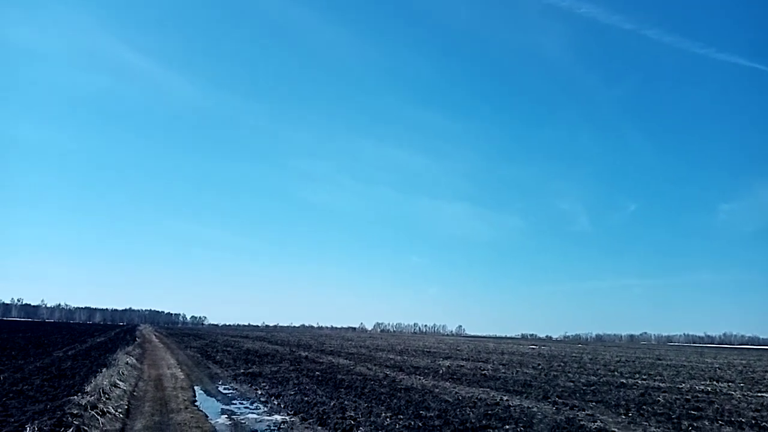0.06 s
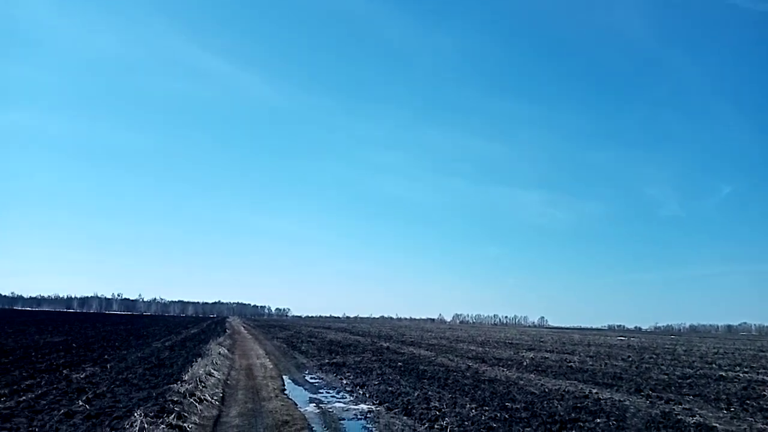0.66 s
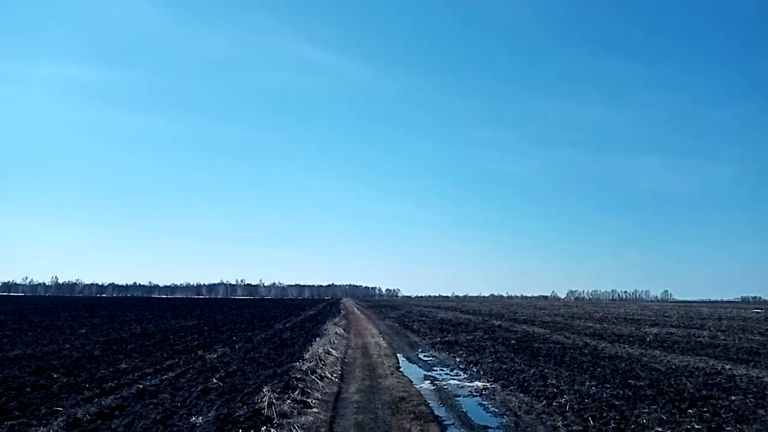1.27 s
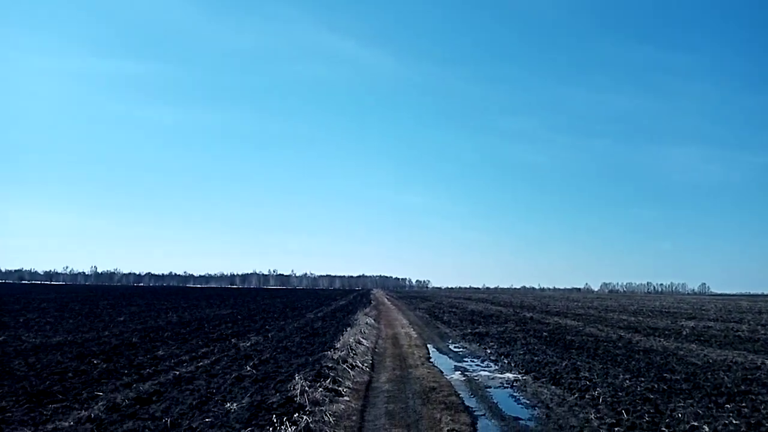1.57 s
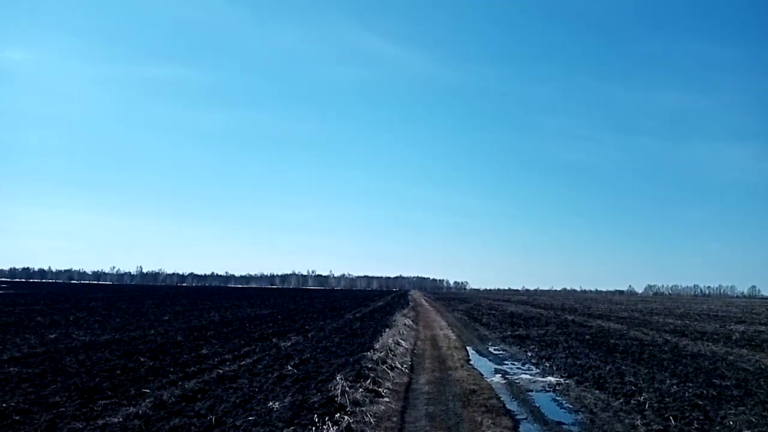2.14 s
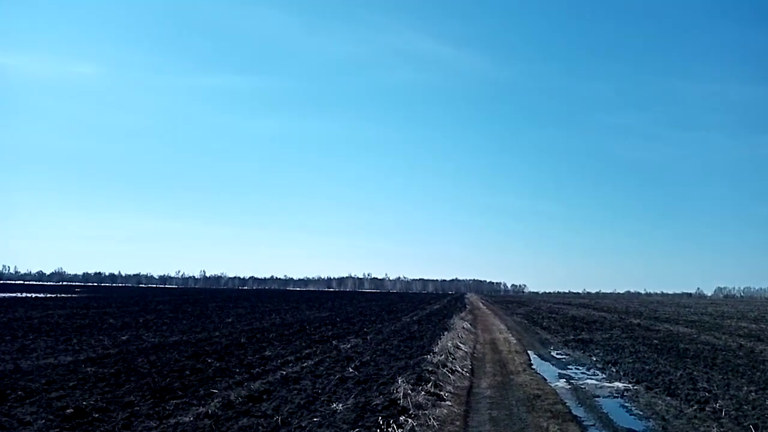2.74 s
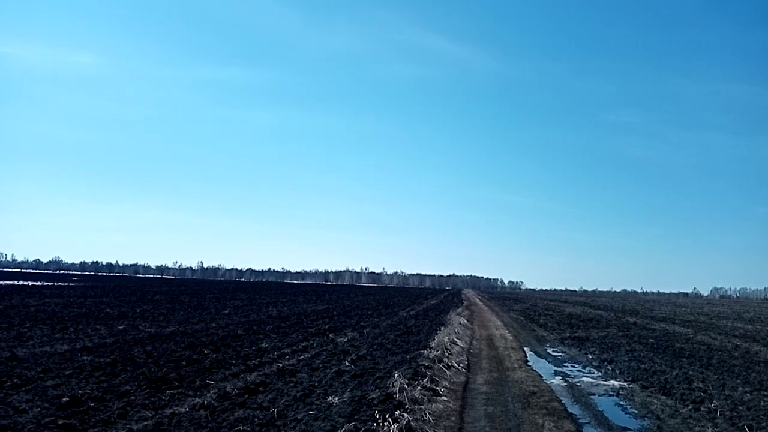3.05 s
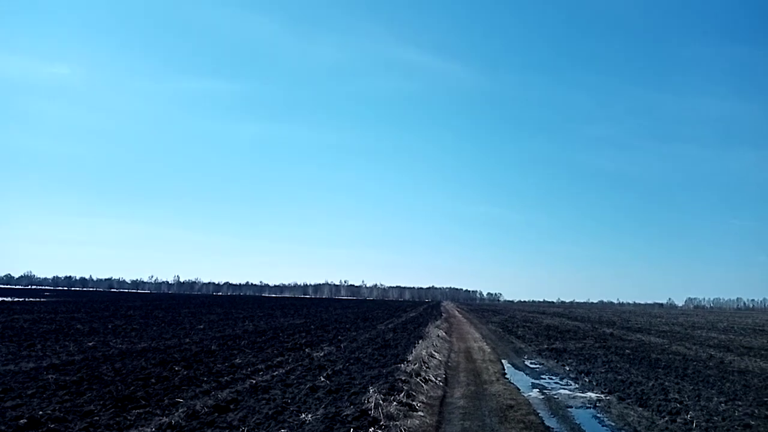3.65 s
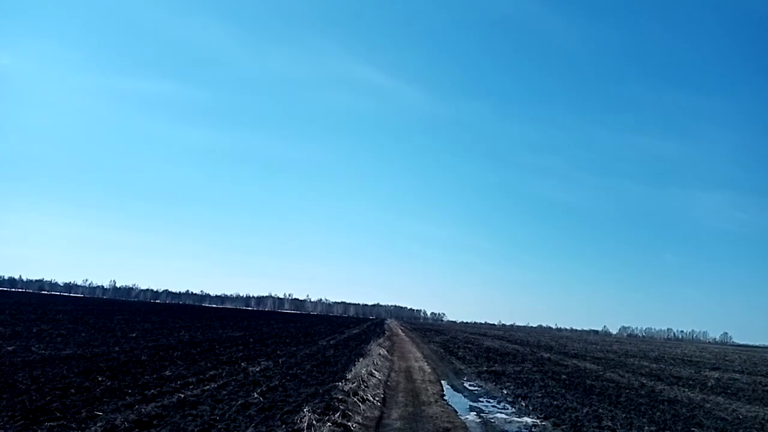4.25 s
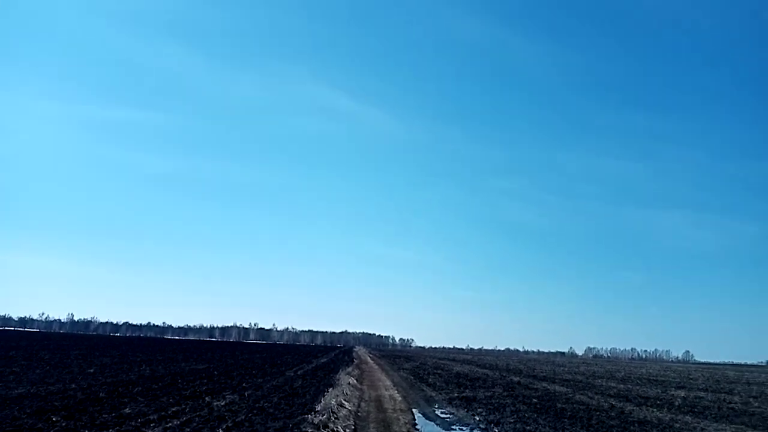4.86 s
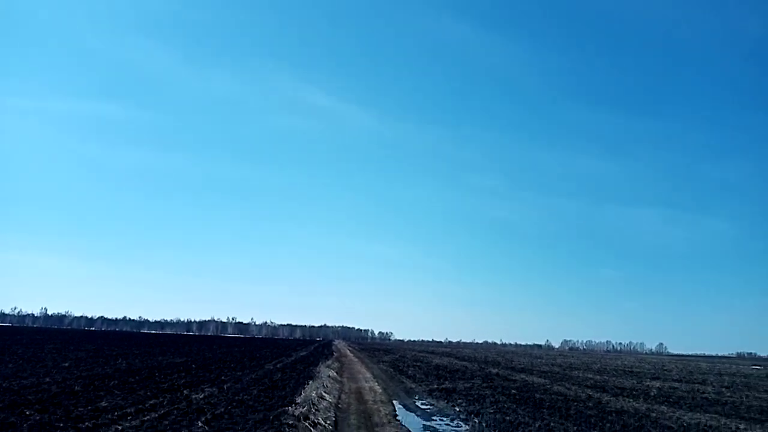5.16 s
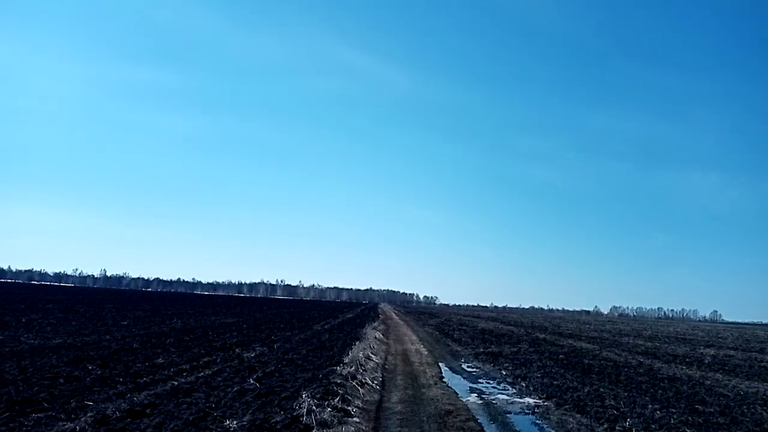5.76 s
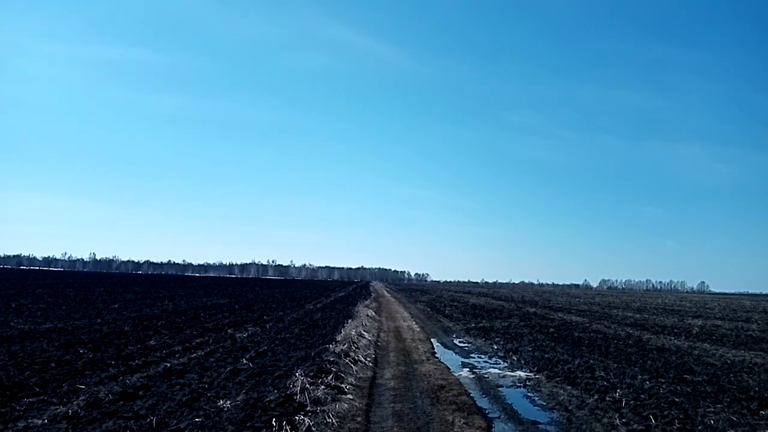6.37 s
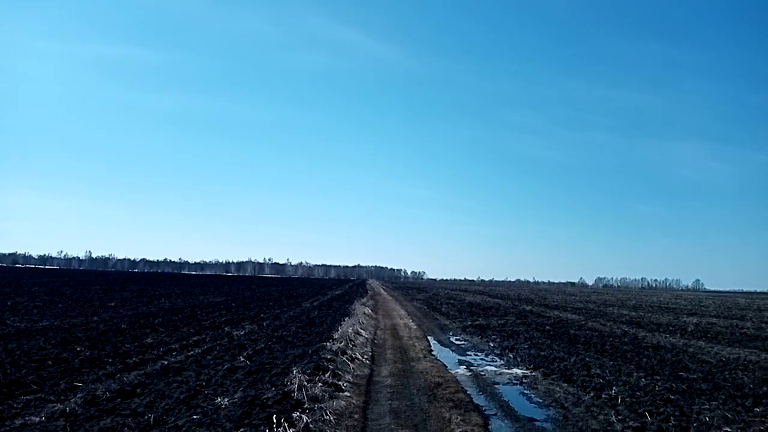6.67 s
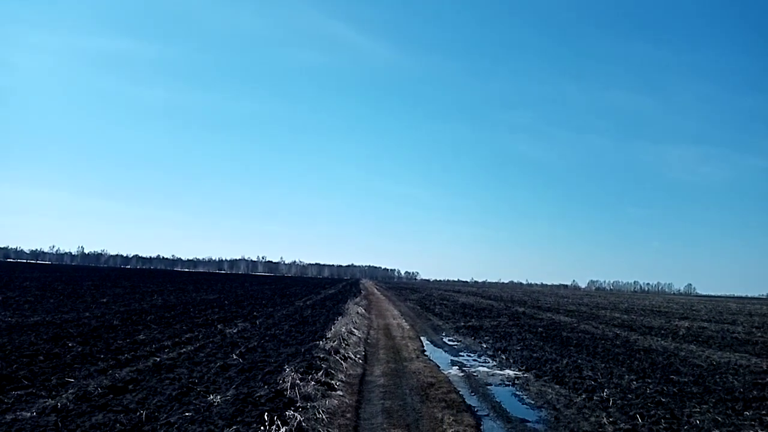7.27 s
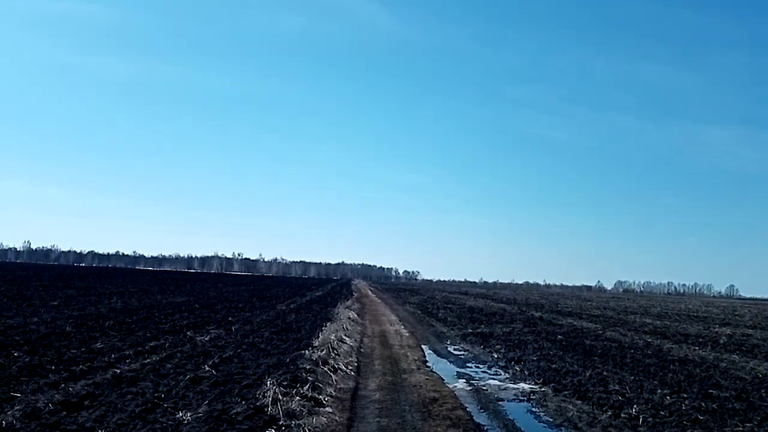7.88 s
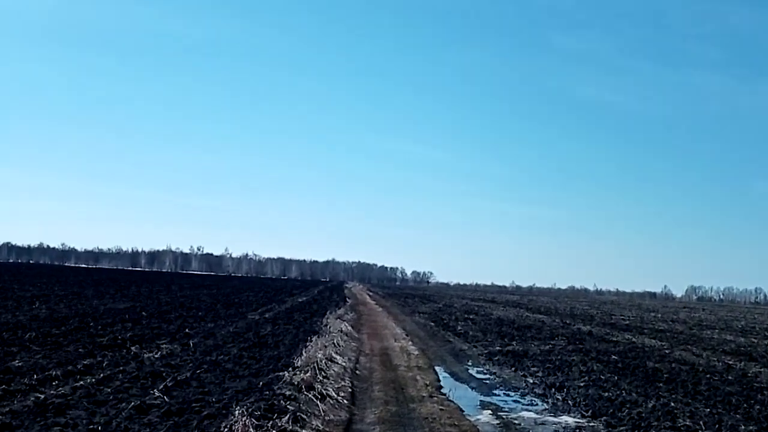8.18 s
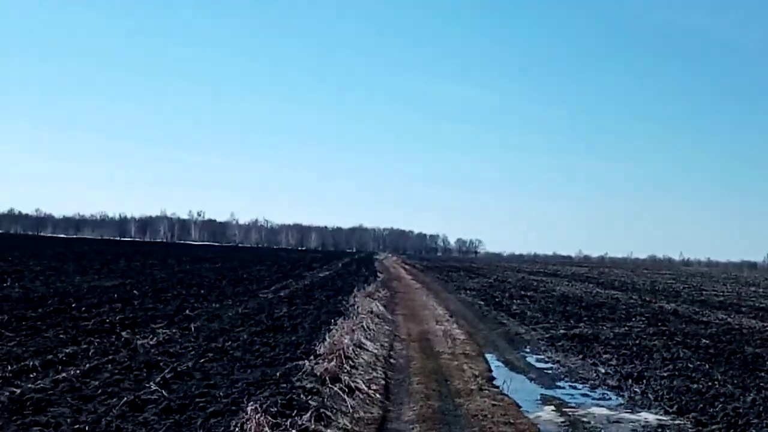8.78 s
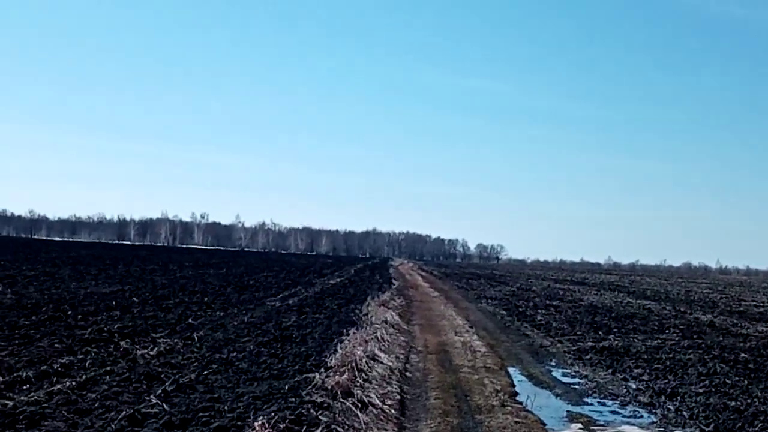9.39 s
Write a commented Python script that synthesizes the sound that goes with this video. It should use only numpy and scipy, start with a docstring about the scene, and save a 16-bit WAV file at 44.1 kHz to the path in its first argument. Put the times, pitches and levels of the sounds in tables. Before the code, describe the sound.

Low wind buffets the microphone while a lark pours out continuous fast trills and whistles, with faint larks far away.

```python
"""A skylark's falling whistle over low wind rumble, then chips and fast trills, often two voices at once.
Its syrinx glides a near-sine tone, or opens and shuts quickly for trills and buzzes.
The ploughed field returns a faint echo; distant larks twitter in a quiet hiss.
A light breeze blows eddies past each microphone port separately, with one strong gust near 3.8 s.
Later something rustles softly near the microphone."""
import sys
import numpy as np
from scipy import signal
from scipy.fft import rfft, irfft, next_fast_len
from scipy.io import wavfile
from scipy.ndimage import uniform_filter1d, map_coordinates

SR = 44100
rng = np.random.default_rng(int(sys.argv[2]) if len(sys.argv) > 2 else 0)


def file_out(sig):
    """Save sig as 16-bit WAV at sys.argv[1]."""
    # one column per channel
    cols = np.atleast_2d(sig).T
    # limit, then scale
    lim = np.clip(cols, -1, 1)
    pcm = np.round(lim * 32767).astype(np.int16)
    wavfile.write(sys.argv[1], SR, pcm)


N = 420273
TIME = np.arange(N) / SR

# Note levels are taken ahead of the gains in field().
# gliding pure notes: t/s, length/s, start f/Hz, middle f/Hz, end f/Hz, level/dB, S-bend/Hz
WHISTLE_NOTES = [(0, 0.11, 4390, 4010, 3830, -62.5, 38), (.226, 0.16, 4294, 4070, 3935, -66, 145),
                 (1.458, 0.048, 4636, 4380, 4760, -74.5, 4), (1.618, 0.21, 5070, 3972, 4700, -66.5, -170),
                 (2.256, 0.045, 4600, 4690, 5440, -70, 8), (2.489, 0.08, 2850, 2560, 3490, -68, -2),
                 (4.063, 0.25, 2627, 2958, 2380, -66.5, 274), (4.255, 0.015, 1260, 1600, 1870, -73.5, -4),
                 (4.43, 0.036, 3380, 3510, 3460, -63, 0), (7.283, 0.014, 5096, 4640, 3630, -65, 2.5),
                 (7.605, 0.064, 5220, 5190, 4820, -62, -42), (7.922, 0.015, 2746, 2880, 4270, -68.5, -5),
                 (8.154, 0.046, 3308, 3662, 3755, -62.5, 15), (8.648, 0.035, 4888, 4940, 4870, -68.5, 0),
                 (9.303, 0.21, 4354, 4430, 3534, -61.5, -100)]
# notes pulsed into upward flicks: t/s, length/s, start f/Hz, end f/Hz, level/dB, pulse rate/Hz
TRILL_NOTES = [(0, 0.22, 3490, 2539, -80, 89), (.147, 0.057, 5300, 5190, -66, 350),
               (1.08, 0.16, 3410, 3380, -80, 146.6), (1.22, 0.15, 3280, 2380, -82.5, 100),
               (2.476, 0.24, 4120, 4200, -77, 204), (3.119, 0.24, 4550, 4580, -84.5, 80),
               (3.673, 0.36, 4647, 3747, -69, 178), (4.093, 0.055, 4890, 4475, -81.5, 56),
               (4.289, 0.2, 3920, 4550, -80.5, 100), (4.478, 0.067, 4860, 5150, -72, 87),
               (4.872, 0.13, 5580, 3684, -68, 143), (4.961, 0.16, 3508, 3247, -65.5, 170),
               (5.493, .086, 4750, 3800, -79.5, 83), (5.634, 0.22, 4350, 4540, -81, 92),
               (7.14, 0.16, 3068, 2870, -82, 143.4), (7.314, 0.14, 2984, 2993, -68, 83),
               (7.41, 0.28, 3527, 3710, -73, 234), (9.15, 0.18, 3850, 3720, -78, 92)]
# bird's bearing as the microphone turns: t/s, right port lag/s, left minus right/dB
BIRD_BEARING = [(0, 0.0011, -2.5), (3.8, 0.0011, 5.5), (5.6, 0.001063, -4), (8.999, 0.001, -1)]
# steady breeze: t/s, left level/dB, right level/dB
BREEZE_LEVELS = [(0, -41, -43), (0.85, -40, -50), (1.35, -38, -43), (2.101, -40, -44), (2.699, -47, -43),
                 (3.002, -56, -56), (3.298, -48, -45), (4.251, -39, -41), (4.698, -50, -45),
                 (5.801, -46, -44), (6.699, -51.5, -46.5), (7.6, -49, -41.5), (8.6, -53.5, -45.5),
                 (9.502, -54, -43)]
# gusts on top: t/s, half length/s, left peak/dB, right peak/dB
GUST_PEAKS = [(0.69, .13, -34, -52), (1.589, 0.11, -38, -54), (3.214, 0.042, -37, -42.5),
              (3.491, .09, -52, -33), (3.705, 0.034, -25.5, -39.5), (3.785, .065, -27, -44),
              (3.966, 0.039, -26.5, -31), (4.168, .12, -36, -45.5), (4.88, 0.084, -41, -50.5),
              (5.58, 0.16, -38.5, -45.5), (5.943, .12, -37.5, -47), (6.202, 0.053, -37, -52),
              (6.38, 0.065, -52.5, -41), (8.013, .12, -42, -38), (9.149, 0.083, -57.5, -42)]
# tight eddies at one port: t/s, peak before bass cut/dB, half width/s, port (0 left, 1 right)
EDDY_THUMPS = [(.051, -22, .0009, 0), (.604, -20, .0009, 0), (.679, -21, .0009, 0), (.721, -13, .001, 0),
               (.729, -19, .0012, 0), (.906, -26, .0011, 0), (1.194, -24, .0008, 1), (1.274, -18, .001, 0),
               (1.568, -16, .0013, 0), (1.772, -25, .0007, 0), (2.161, -27, .0007, 0),
               (2.733, -21, .001, 0), (3.669, -13, .0006, 0), (3.684, -13, .0007, 0),
               (3.703, -15, .0007, 0), (3.708, -11, .0006, 0), (3.735, -18, .00055, 0),
               (3.784, -24, .0005, 0), (3.811, -24, .0004, 0), (3.981, -14, .00055, 0), (3.99, -9, .002, 0),
               (3.993, -21, .0006, 0), (5.896, -20, .0012, 0), (6.218, -19, .003, 0),
               (7.745, -30, .0008, 1)]
# still air and microphone hiss: f/Hz, relative density/dB
HISS_SPECTRUM = [(1000, 0), (2000, -1.5), (4000, 0), (6300, -4), (8000, -9), (14000, -12)]
# repeated note: first t/s, last t/s, repeats, length/s, start f/Hz, middle f/Hz, end f/Hz, level/dB
CHIP_RUNS = [ (0.344, 0.931, 6, 0.02, 4500, 5080, 4370, -73),
             (0.382, 0.964, 6, .014, 4230, 4820, 6020, -75),
             (0.405, 0.985, 6, 0.032, 6620, 6060, 5950, -81.5),
             (0.434, 0.915, 8, 0.0096, 2460, 2266, 2200, -74),
             (0.445, 0.928, 8, 0.017, 3110, 3570, 4040, -69),
             (0.483, 0.832, 4, 0.0099, 4030, 4000, 3840, -67.5),
             (1.034, 1.176, 5, 0.013, 5380, 4815, 4640, -67.5),
             (1.257, 1.369, 4, 0.015, 4060, 4207, 4100, -66),
             (4.702, 4.765, 2, 0.01, 2600, 2678, 2840, -73),
             (4.819, 4.873, 4, 0.011, 5200, 5950, 6385, -78.5),
             (6.086, 6.199, 4, 0.011, 5080, 5460, 5240, -78.5),
             (6.621, 6.872, 4, .02, 3000, 3100, 2900, -87),
             (8.665, 8.742, 4, 0.0077, 5396, 5880, 6600, -73)]
# unbroken sweeps: t/s, length/s, start f/Hz, end f/Hz, level/dB, rate/Hz, sweep/Hz (minus: downward)
BUZZ_NOTES = [(.988, 0.2, 4680, 4480, -74.5, 134, -600), (1.251, 0.18, 3905, 3950, -74.5, 73, -1300),
              (1.46, .15, 5350, 5480, -68.5, 135, -1000), (1.888, 0.057, 5090, 6167, -68, 70, -800),
              (1.979, 0.07, 3780, 3550, -65, 52, -700), (2.086, .14, 3920, 3950, -70, 85, -1300),
              (2.36, 0.076, 2870, 2700, -76, 68, -1280), (2.728, 0.068, 5140, 5670, -70.5, 260, -1500),
              (4.523, 0.11, 4943, 4390, -72.5, 92, -500), (4.675, 0.073, 4200, 3191, -71, 130, -1400),
              (5.464, 0.18, 2944, 3027, -71.5, 91, -1360), (7.165, 0.087, 3920, 3820, -68.5, 90, -600),
              (7.504, .08, 4380, 5396, -67, 170, 802), (7.718, 0.16, 4453, 2946, -65, 66, -950),
              (7.858, 0.03, 6970, 5725, -72, 75, -1600), (7.946, 0.033, 7000, 5217, -69.5, 150, -1600),
              (7.951, 0.16, 4035, 3784, -68, 156, -1350), (8.45, 0.18, 4892, 5014, -67.5, 150, -1650),
              (8.69, 0.17, 4110, 2819, -63.5, 110, 650)]
# short dropping notes: t/s, length/s, f/Hz, level/dB
PIP_NOTES = [(1.625, 0.05, 5090, -66), (1.752, 0.017, 3020, -75), (2.29, 0.017, 4300, -68),
             (2.327, 0.036, 3550, -67), (2.624, 0.026, 3500, -70), (2.656, 0.023, 3357, -62.5),
             (3.388, 0.025, 3465, -68), (3.413, 0.011, 3690, -63.5), (3.465, 0.037, 4610, -75.5),
             (4.728, 0.032, 3530, -69.5), (7.138, 0.021, 4395, -64), (8.142, 0.017, 4265, -66)]
# stuttering falls: t/s, length/s, start f/Hz, level/dB
SLIDE_NOTES = [(3.49, 0.14, 4790, -72.5), (5.618, 0.15, 3000, -78), (8.23, 0.16, 3870, -71.5)]
# soft rubbing: t/s, half length/s, level/dB
RUSTLE_SWELLS = [(4.53, .04, -79), (4.74, .06, -74), (4.838, .0015, -57), (4.9, .05, -82), (8.0, .15, -84)]
# its colour: f/Hz, relative density/dB
RUSTLE_SPECTRUM = [(400, -10), (900, 10), (1400, 3), (2100, 8), (4000, 0), (6300, -1), (9000, -11),
                   (14000, -24)]
# even run of held, then dropped notes: t/s, held f/Hz, held level/dB
HOOK_NOTES = [(5.153, 4733, -68.5), (5.202, 4970, -62.5), (5.249, 4990, -63.5), (5.299, 4960, -64),
              (5.35, 5039, -55)]
# recurring phrase: t/s, opening level/dB, ending level/dB
PHRASE_REPEATS = [(5.821, -65.5, -64.5), (6.188, -65, -66), (8.922, -65, -70.5)]
# long buzzy falls: t/s, length/s, top f/Hz, level/dB
SLUR_NOTES = [(6.562, .203, 5040, -68), (6.841, .225, 5180, -66)]

FLICK_SWEEP_HZ, BUZZ_SHARPNESS = 700, .26


def amp(db):
    """dB to amplitude."""
    return 10 ** (np.asarray(db) / 20)


def unit_rms(x):
    """Scale to rms 1."""
    return x / np.sqrt(np.mean(x ** 2) + 1e-20)


def clock(length_s):
    """Sample times of one note."""
    return np.arange(0, length_s, 1 / SR)


def add(mix, at_s, sound):
    """Mix a sound in at at_s."""
    part = mix[max(round(at_s * SR), 0):][:len(sound)]
    part += sound[:len(part)]


def noise(gain_at):
    """Noise of rms 1 with spectrum gain_at(hz)."""
    size = next_fast_len(N, True)
    spectrum = rfft(rng.standard_normal(size)) * gain_at(np.fft.rfftfreq(size, 1 / SR))
    return unit_rms(irfft(spectrum, size)[:N])


def stereo_noise(spectrum):
    """Independent noise per port, coloured by rows of f/Hz, level/dB."""
    f_hz, db = np.transpose(spectrum)
    return np.array([noise(lambda hz: amp(np.interp(np.log(hz + 1), np.log(f_hz), db)))
                     for _ in range(2)])


def wander(t, rate_hz):
    """Random line with rate_hz knots a second."""
    return np.interp(t * rate_hz, np.arange(2048), np.clip(rng.standard_normal(2048), -2.4, 2.4))


def syrinx(t, pitches_hz, db, sweep_hz=0, pulsing=1, waver=.009, swell_db=2, flutter_db=2):
    """Near-sine voice gliding through a few pitches, with swell and flutter."""
    progress = t / t[-1]
    glide = np.polyfit(np.linspace(0, 1, len(pitches_hz)), pitches_hz, len(pitches_hz) - 1)
    hz = np.polyval(glide, progress) * (1 + waver * wander(t, 440)) + sweep_hz
    gate = np.sin(np.pi / 2 * np.clip(np.minimum(t, t[-1] - t) / .002, 0, 1)) ** 2
    shape_db = swell_db * (progress + np.sin(np.pi * progress)) + flutter_db * wander(t, 150)
    tone = np.sin(2 * np.pi * np.cumsum(hz) / SR)
    return amp(db) * unit_rms(gate * pulsing * amp(shape_db) * tone)


def whistle(length_s, start_hz, middle_hz, end_hz, db, bend_hz):
    """Pure arc; an S-bend moves its turn early or late."""
    t = clock(length_s)
    return syrinx(t, [start_hz, middle_hz, end_hz], db, bend_hz * np.sin(2 * np.pi * t / length_s))


def pulsed_syrinx(t, pitches_hz, db, rate_hz, sweep_hz, sharpness, scatter=.1, focus=2, taper_db=-6):
    """The syrinx opens and shuts quickly; each opening is a tiny, slightly uneven glide."""
    cycle = np.cumsum(rate_hz * (1 + .06 * wander(t, rate_hz / 2))) / SR % 1
    opening = np.sin(np.pi * cycle) ** 2
    valve = .018 + opening ** (sharpness / 2)  # leaks when shut
    # pitch swings back while the valve is nearly shut
    swing = -(np.sin(2 * np.pi * cycle) + np.sin(4 * np.pi * cycle) / np.pi) / np.sqrt(2 * np.pi)
    swing += scatter * wander(t, 2 * rate_hz)
    arch = abs(np.sin(np.pi * t / t[-1])) ** .25
    throat = np.exp(-focus * swing ** 2)  # favours mid-glide
    pulsing = valve * np.sqrt(arch) * throat * amp(taper_db * (t / t[-1]) ** 4)
    return syrinx(t, pitches_hz, db, sweep_hz * swing * arch, pulsing, swell_db=1)


def trill(length_s, start_hz, end_hz, db, rate_hz):
    """Upward flicks on a glide that starts fast and settles; slower flicks reach further."""
    pitches_hz = [start_hz, start_hz + .7 * (end_hz - start_hz), end_hz]
    sweep_hz = FLICK_SWEEP_HZ * np.sqrt(120 / rate_hz)
    return pulsed_syrinx(clock(length_s), pitches_hz, db, rate_hz, sweep_hz, sharpness=.36)


def field(song, gain_db=5, ground_gain=.35, ground_s=.0075,
          near_db=-12, near_t60_s=.23, far_db=-21, far_t60_s=1):
    """Song reaches the left port first; the ground mirrors it, clods and far furrows scatter it."""
    mirrored = np.pad(song, (round(ground_s * SR), 0))[:N]
    song = amp(gain_db) * (song + ground_gain * mirrored)
    at_s, *bearing = np.transpose(BIRD_BEARING)
    lag_s, lean_db = (np.interp(TIME, at_s, column) for column in bearing)
    left = song * amp(lean_db / 2)
    right = map_coordinates(song, [(TIME - lag_s) * SR], order=3) * amp(-lean_db / 2)
    t = TIME[:SR // 2]
    ports = []
    for direct in (left, right):
        near, far = rng.standard_normal((2, len(t))) * amp([-60 * t / near_t60_s, -60 * t / far_t60_s])
        echo = amp(near_db) * near / np.linalg.norm(near) + amp(far_db) * far / np.linalg.norm(far)
        ports.append(direct + signal.fftconvolve(song, echo)[:N])
    return np.array(ports)


def airflow_db(side):
    """Wind level at one port: breeze plus bell-shaped gusts."""
    breeze_s, *levels_db = np.transpose(BREEZE_LEVELS)
    power = amp(np.interp(TIME, breeze_s, levels_db[side])) ** 2
    for at_s, half_s, *peaks_db in GUST_PEAKS:
        power += amp(peaks_db[side]) ** 2 * np.exp(-((TIME - at_s) / half_s) ** 2)
    return 10 * np.log10(power)


def bass_cut(pressure, corner_hz=85):
    """The microphone passes no deep bass."""
    return signal.sosfilt(signal.butter(4, corner_hz, "highpass", fs=SR, output="sos"), pressure)


def buffeting(level_db, calm_db, eddy_hz=97, puff_db=6.5, puff_rate_hz=48):
    """Frozen eddies blown past one port in puffs; faster air is louder and brighter."""
    puffs_db = puff_db * np.tanh(wander(TIME, puff_rate_hz) - .5)
    puffs_db = uniform_filter1d(puffs_db, size=SR // 220)  # air takes a moment to speed up
    speed = amp(.34 * (level_db + puffs_db - calm_db))  # 1 at calm_db
    eddies = noise(lambda hz: np.exp(-(hz / eddy_hz) ** 1.15))
    passing = map_coordinates(eddies, [np.cumsum(speed)], order=1, mode="mirror")
    pressure = bass_cut(passing * amp(puffs_db))
    power = uniform_filter1d(uniform_filter1d(pressure ** 2, size=SR // 8), size=SR // 16)
    return pressure / np.sqrt(abs(power) + 1e-9) * amp(level_db)


def wind(calm_db=(-49, -41)):
    """Separate turbulence per port; now and then a tight eddy pushes and pulls."""
    ports = np.array([buffeting(airflow_db(side), calm_db[side]) for side in range(2)])
    t = np.arange(-SR // 20, SR // 20) / SR
    for at_s, db, half_s, side in EDDY_THUMPS:
        push_pull = ((1 - 1j * t / (2 * half_s)) ** -3).real
        add(ports[side], at_s + t[0], bass_cut(amp(db) * push_pull))
    return ports


def hiss(level_db=-82.5):
    """Steady background of still air and microphone noise."""
    return amp(level_db) * stereo_noise(HISS_SPECTRUM)


def distant_larks(floor_db=-97, centre_hz=3900, count=380):
    """Faint far trills, a few nearer than the rest, merge into a twitter."""
    chorus = np.zeros(N)
    for when, height, glide, pace, nearness in rng.random((count, 5)):
        octaves = np.arcsin(2 * height - 1) / np.pi * np.sqrt(2)
        pitches_hz = centre_hz * 2 ** octaves * (1 + np.array([-1, 1]) * (glide - .5) / 4)
        t = clock(.09 * (1 - nearness ** 2 / 2))
        db = floor_db + 10 * nearness ** 10
        rate_hz = 60 * (1 + 2 * pace)
        note = pulsed_syrinx(t, pitches_hz, db, rate_hz, FLICK_SWEEP_HZ * pace, BUZZ_SHARPNESS)
        add(chorus, when * N / SR, note)
    return chorus


def chip(length_s, pitches_hz, db):
    """Tiny rough glide; pitch and accent vary per repeat."""
    drift, accent = rng.standard_normal(2)
    pitches_hz = np.multiply(pitches_hz, amp(drift / 10))
    return syrinx(clock(length_s), pitches_hz, db + 2 * accent, waver=.022, flutter_db=6)


def buzz(length_s, start_hz, end_hz, db, rate_hz, sweep_hz, arch_hz=80.1):
    """Wide sweeps run together on an arched glide."""
    pitches_hz = [start_hz, (start_hz + end_hz) / 2 + arch_hz, end_hz]
    return pulsed_syrinx(clock(length_s), pitches_hz, db, rate_hz, sweep_hz, BUZZ_SHARPNESS)


def pip(length_s, hz, db):
    """Short pure note that drops at its end."""
    return syrinx(clock(length_s), [hz * 1.035, hz, hz * .915], db)


def rattle(length_s=.43, db=-74, click_rate_hz=62.7, click_s=.0009):
    """Dry low rattle: sharp, evenly spaced clicks over a faint rasp."""
    t = clock(length_s)
    pitches_hz = np.linspace(2520, 2650, 3)
    pulses = np.exp(-((t % (1 / click_rate_hz) - .004) / click_s) ** 2 / 2)
    clicks = syrinx(t, pitches_hz, 0, pulsing=pulses, swell_db=-3.5, flutter_db=4.5)
    rasp = pulsed_syrinx(t, pitches_hz, 0, rate_hz=740, sweep_hz=1550, sharpness=BUZZ_SHARPNESS)
    arch = np.sqrt(abs(np.sin(np.pi * t / length_s)))
    return amp(db) * unit_rms((clicks + .52 * rasp) * arch)


def slide(length_s, start_hz, db, floor_hz=1916, fall_s=.036, fade_db=-23.5):
    """The voice falls steeply, levels out and fades, fluttering."""
    t = clock(length_s)
    pitches_hz = floor_hz + (start_hz - floor_hz) * np.exp(-np.linspace(0, length_s, 5) / fall_s)
    note = pulsed_syrinx(t, pitches_hz, 0, rate_hz=42, sweep_hz=-180, sharpness=.7,
                         scatter=.3, taper_db=1)
    return amp(db) * unit_rms(note * amp(fade_db * t / length_s))


def rustle(grain_db=-5, grain_rate_hz=200):
    """Grainy rubbing that swells and dies away."""
    swell = sum(amp(db) * np.exp(-((TIME - at_s) / half_s) ** 2 / 2)
                for at_s, half_s, db in RUSTLE_SWELLS)
    grains = unit_rms(amp(grain_db * wander(TIME, grain_rate_hz)))
    return swell * grains * stereo_noise(RUSTLE_SPECTRUM)


def hook(top_hz, top_db, length_s=.05, hold_s=.022, drop_s=.0022,
         low_hz=3850, low_db=-66.5, sag_hz_per_s=10000):
    """The voice holds a high pitch, snaps down and sags."""
    t = clock(length_s)
    dropped = (1 + np.tanh((t - hold_s) / drop_s)) / 2
    fall_hz = dropped * (top_hz - low_hz + sag_hz_per_s * (t - hold_s))
    level = amp(top_db + dropped * (low_db - top_db)) * np.sqrt(abs(np.sin(np.pi * t / length_s)))
    level *= 1 - 2 * dropped * (1 - dropped)  # thins during the leap
    return level * syrinx(t, [top_hz, top_hz], 0, -fall_hz, flutter_db=1.5)


def phrase(opening_db, ending_db):
    """Tick, faint high pip, whistle stepping down; then a buzz tips into a slide."""
    notes = np.zeros(SR // 2)
    add(notes, 0, pulsed_syrinx(clock(.026), [4200, 3950, 4200], opening_db,
                                rate_hz=120, sweep_hz=-1200, sharpness=.4))
    add(notes, .033, pip(.022, 5950, opening_db - 11.5))
    add(notes, .046, syrinx(clock(.016), [4850, 4900], opening_db + 2))
    add(notes, .066, pip(.016, 4450, opening_db - 1.5))
    add(notes, .106, pulsed_syrinx(clock(.12), [3940, 4060, 4170, 3550], ending_db,
                                   rate_hz=120, sweep_hz=-750, sharpness=BUZZ_SHARPNESS))
    add(notes, .219, slide(.091, 3350, ending_db - 7.5))
    return notes


def slur(length_s, top_hz, db, end_hz=3620, rate_hz=92, widest_hz=-1150):
    """Steepening fall: starts pure, widens to a buzz, narrows to a whistle."""
    t = clock(length_s)
    pitches_hz = top_hz + (end_hz - top_hz) * np.linspace(0, 1, 4) ** 2.4
    sweep_hz = widest_hz * np.sin(np.pi * (t / length_s) ** .73)
    return pulsed_syrinx(t, pitches_hz, db, rate_hz, sweep_hz, BUZZ_SHARPNESS, focus=0, taper_db=5.5)


def skylark(rattle_at_s=2.874):
    """The whole song; overlapping notes give two voices."""
    song = np.zeros(N)
    for table, note in ((WHISTLE_NOTES, whistle), (PIP_NOTES, pip), (BUZZ_NOTES, buzz),
                        (TRILL_NOTES, trill), (SLIDE_NOTES, slide), (HOOK_NOTES, hook),
                        (SLUR_NOTES, slur), (PHRASE_REPEATS, phrase)):
        for at_s, *row in table:
            add(song, at_s, note(*row))
    add(song, rattle_at_s, rattle())
    for first_s, last_s, repeats, length_s, *pitches_hz, db in CHIP_RUNS:
        for at_s in np.linspace(first_s, last_s, round(repeats)):
            add(song, at_s, chip(length_s, pitches_hz, db))
    return song


def scene():
    """Larks over the field, wind, rustles, hiss."""
    return field(skylark() + distant_larks()) + wind() + rustle() + hiss()


def record(dry, edge_hz=15500, fade_s=.008):
    """Short fade at both ends, then band limit."""
    fade = np.clip(np.minimum(TIME, TIME[-1] - TIME) / fade_s, 0, 1)
    lowpass = signal.firwin(511, edge_hz, window=("kaiser", 9), fs=SR)
    return signal.oaconvolve(dry * fade, lowpass[None], "same")


dry = scene()
out = record(dry)
file_out(out)
```